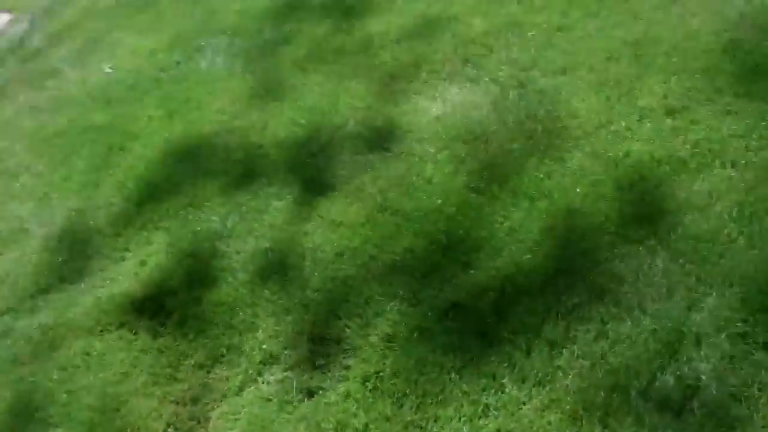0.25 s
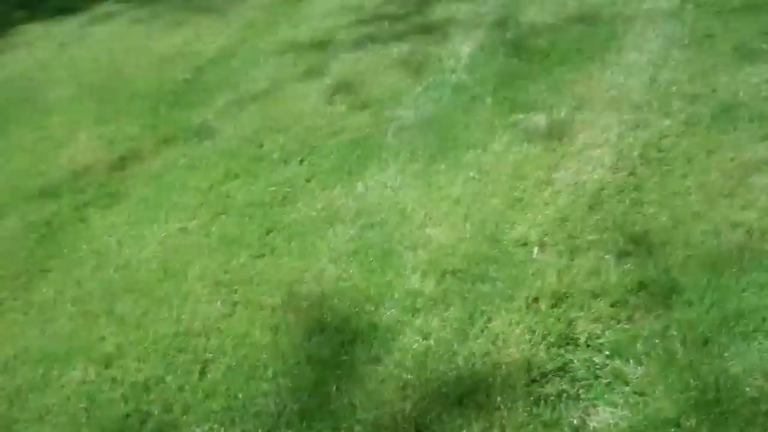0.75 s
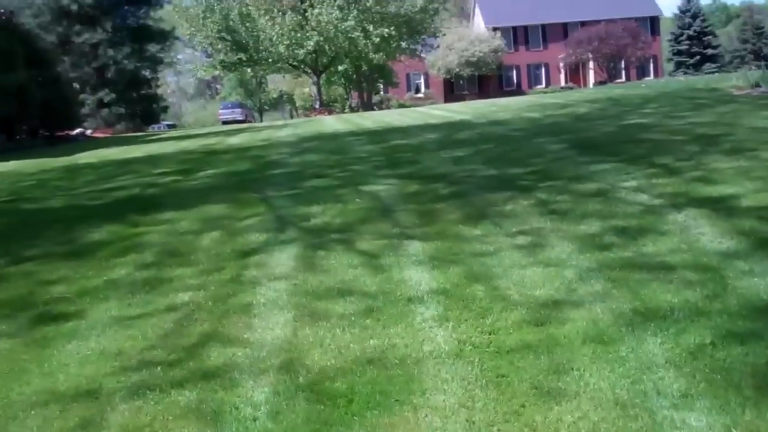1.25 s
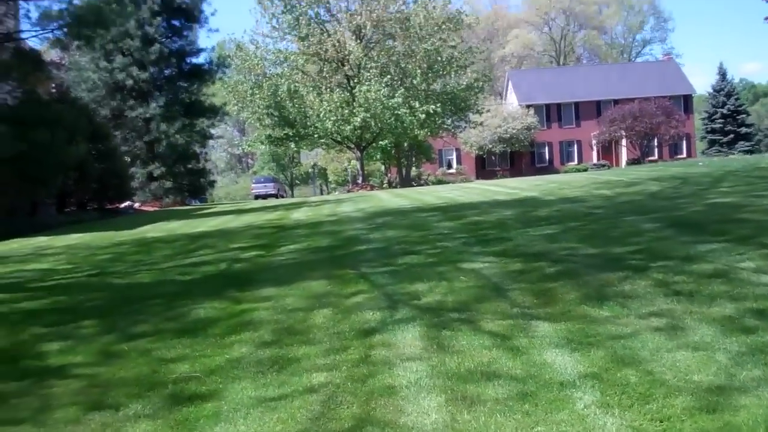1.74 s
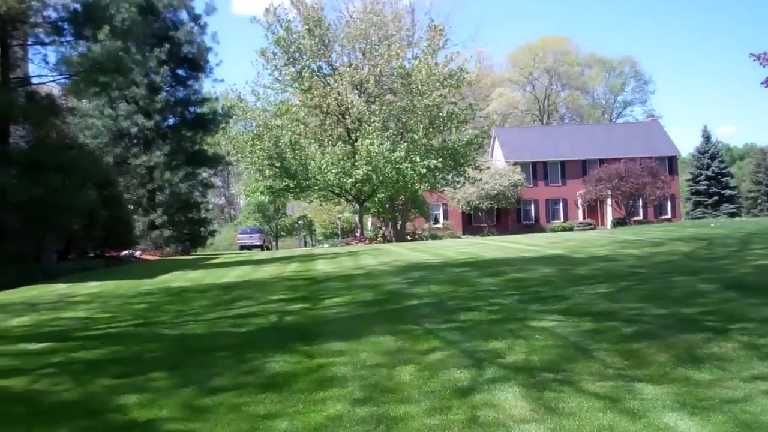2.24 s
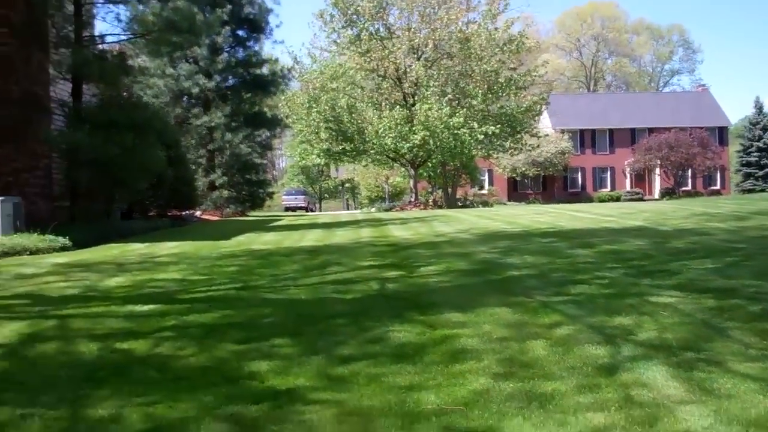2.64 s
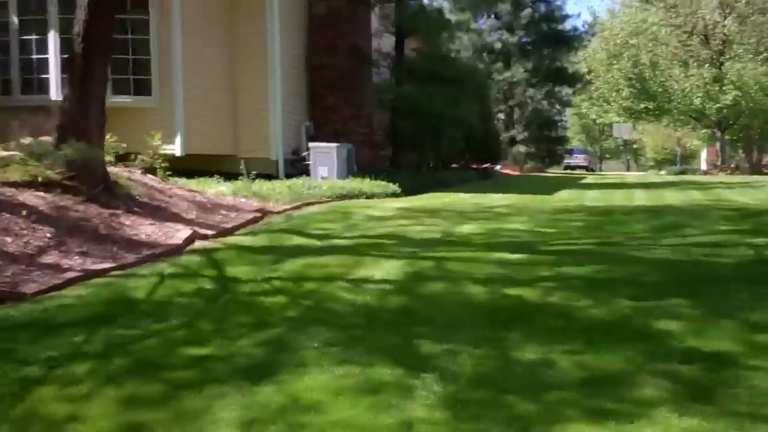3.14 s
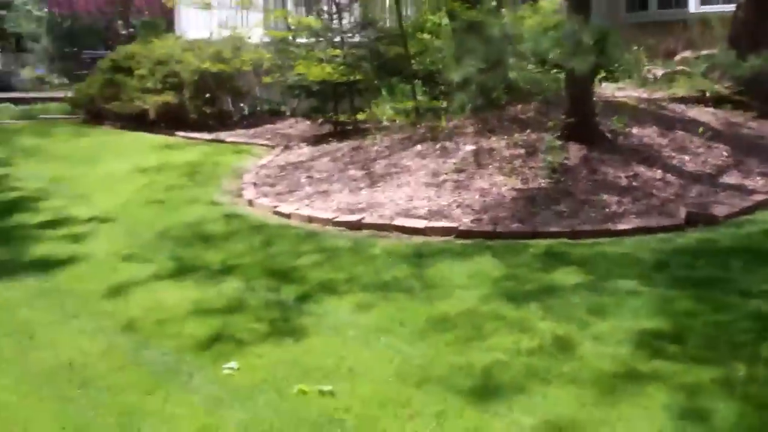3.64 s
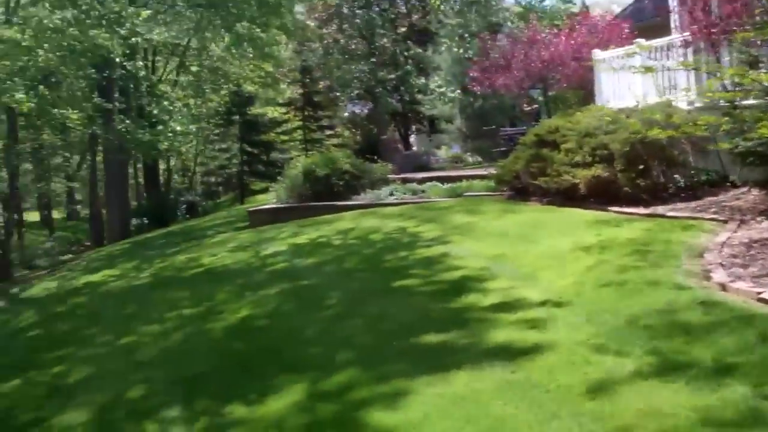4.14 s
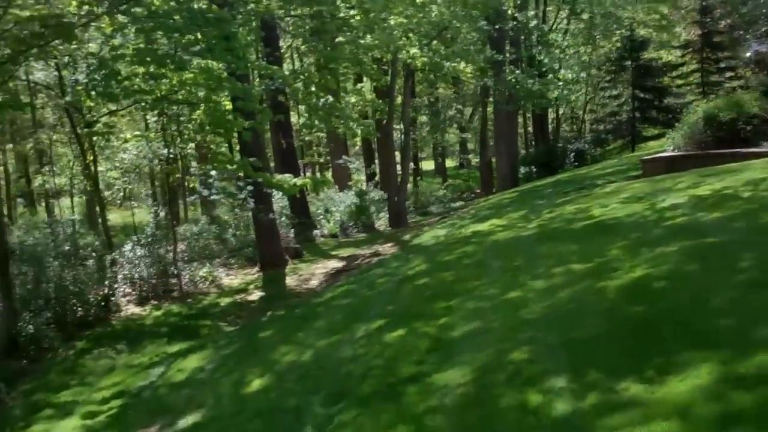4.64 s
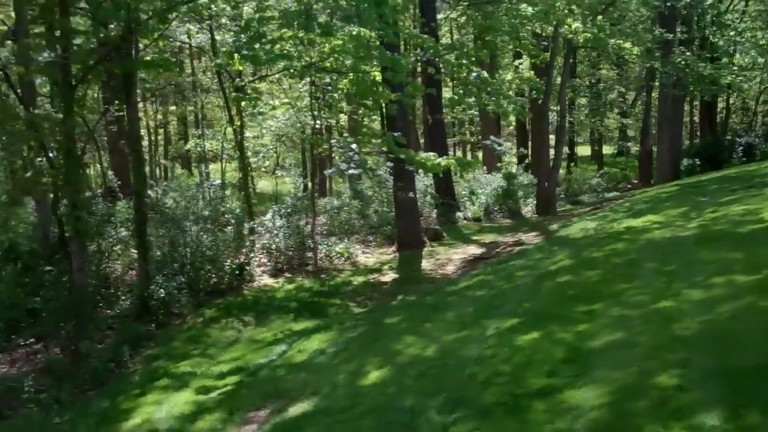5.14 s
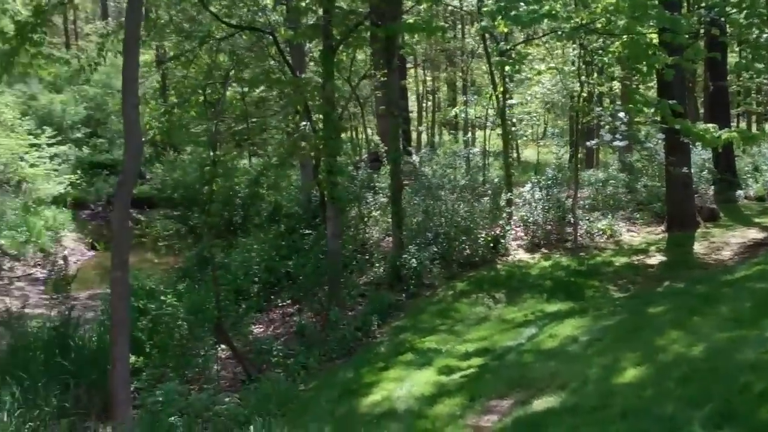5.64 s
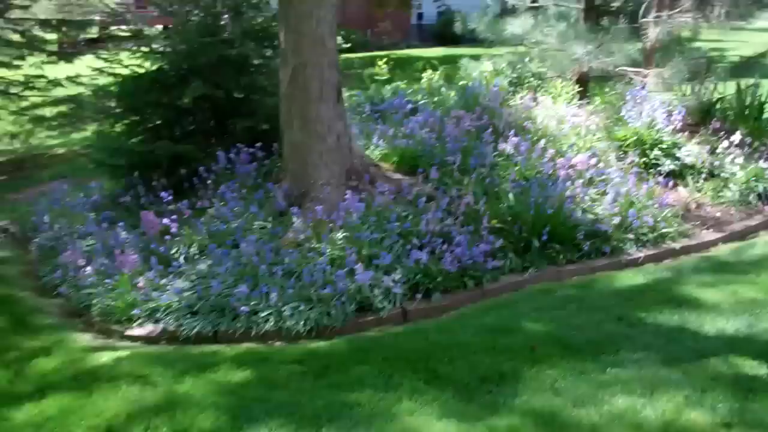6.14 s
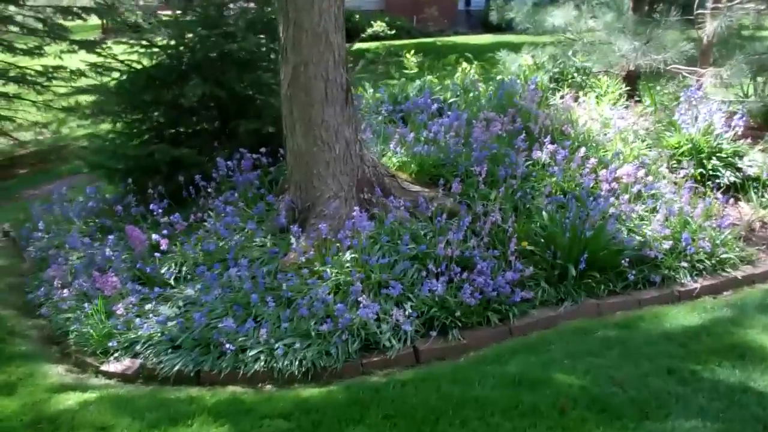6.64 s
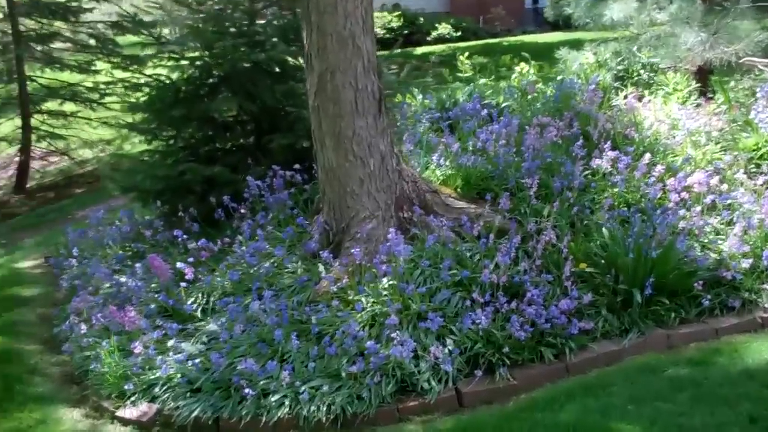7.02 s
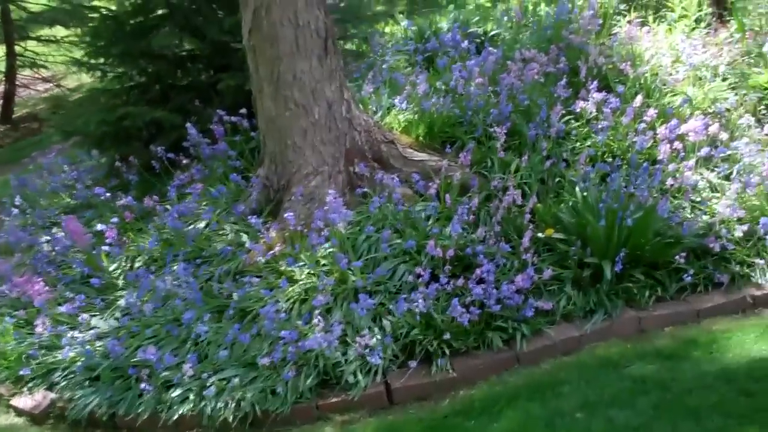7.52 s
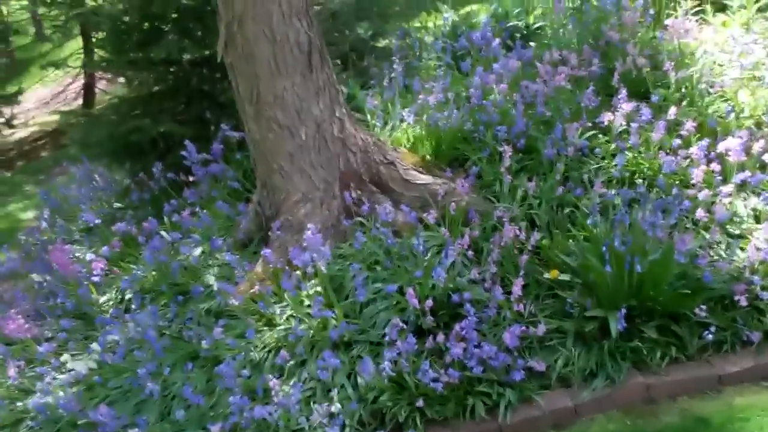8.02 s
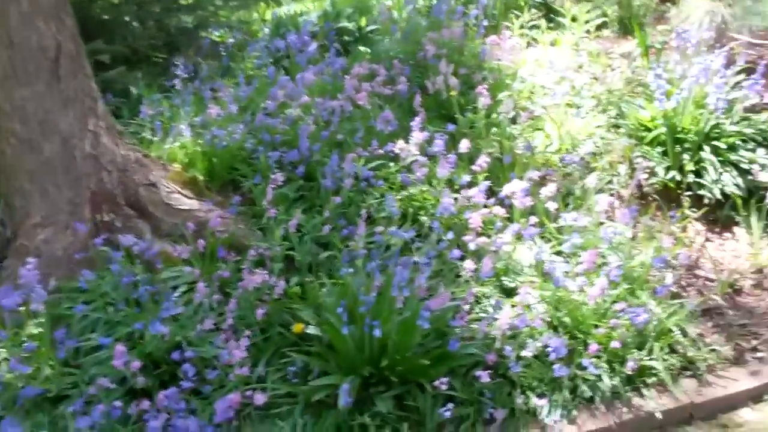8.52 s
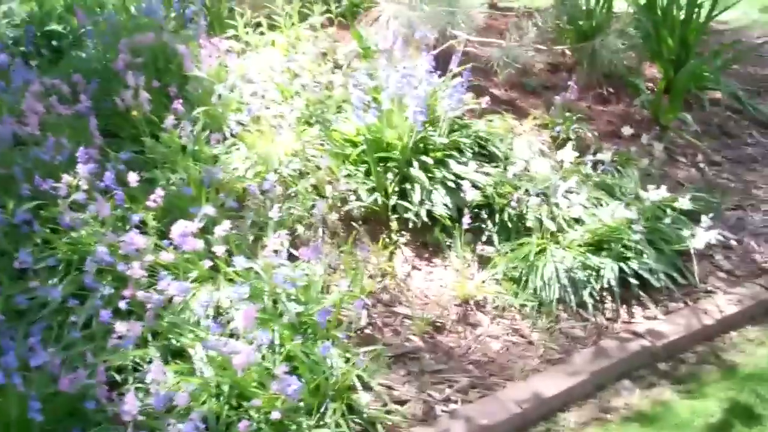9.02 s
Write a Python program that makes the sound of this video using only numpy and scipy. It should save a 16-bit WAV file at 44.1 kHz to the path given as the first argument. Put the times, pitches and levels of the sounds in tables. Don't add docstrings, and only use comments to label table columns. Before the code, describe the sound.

Close two-stroke-like buzzing and tinny clatter for seven seconds, a brief dropout, engine coasts to a stop, then quiet yard with a whistling bird.

```python
import sys
import numpy as np
from scipy import signal
from scipy.fft import rfft, irfft, next_fast_len
from scipy.io import wavfile
from scipy.ndimage import map_coordinates

SR = 44100
rng = np.random.default_rng(int(sys.argv[2]) if len(sys.argv) > 2 else 0)


def boost(x):
    u = np.asarray(x, float) / 20
    return 10 ** u


def transcribe(signal):
    frames = np.atleast_2d(signal).T
    limited = np.clip(frames, -1, 1)
    pcm = np.round(limited * 32767).astype(np.int16)
    wavfile.write(sys.argv[1], SR, pcm)


N = 408807
SECONDS = np.arange(N) / SR

# (time [s], speed [turns/s])
SHAFT_SPEED = [(0, 46.35), (.87, 45.52), (1.56, 43.16), (1.57, 41.87), (2.44, 42.59), (2.48, 44.21),
               (3.65, 43.19), (3.77, 45.46), (4.14, 46.86), (4.79, 43.43), (4.98, 41.26), (5.77, 43.3),
               (6.53, 45.35), (7.05, 43), (7.31, 15.1), (7.7, 3)]
# (time [s], exhaust side level [dB], tin side level [dB])
FACING = [(0, -41.5, -16), (.2, -42.5, -19.5), (.42, -41, -16), (.8, -41, -13.5), (1.35, -40, -14.5),
          (1.75, -43, -22.5), (2.6, -42, -21), (3.22, -42, -21), (3.4, -43.5, -19.5), (4, -45, -23),
          (4.25, -40, -23.5), (4.45, -37.5, -21), (5.05, -32, -21), (6.19, -28.5, -19), (6.23, -41, -22),
          (6.9, -41.5, -25), (7.23, -42, -20.5), (7.45, -43, -13)]
# (time [s], left lag of bass [samples], of treble [samples], direct share [0-1],
# treble left over right [dB])
BEARING = [(0, 3.6, 5.6, 0.56, 2), (.28, 5.1, 5.4, 0.43, -6.5), (.62, 5.7, 5.2, 0.54, -2),
           (.7, 3.6, 4.55, 0.5, -2), (1.12, 2.8, 3.7, 0.62, -3), (1.3, 4.3, 4.2, 0.3, 0),
           (1.65, 6.4, 4.5, 0.7, -8.5), (2.4, 6.45, 5.2, 0.56, -4.5), (3.2, 5.9, 5.7, 0.5, -4),
           (3.45, 5.5, 6, 0.4, -8), (4.3, 5.1, 6, 0, -10.5), (4.7, 5.2, 4.7, 0.37, -2),
           (5.5, 2.7, 5.6, 0.26, -3.5), (6.18, 3.7, 6.4, 0.15, 2.5), (6.25, 3.9, 3.7, 0.15, -10.5),
           (7.4, 3, 2.9, 0.16, -5.5), (8.1, 3.1, 4, 0.64, 0), (9.3, 3.6, 4.2, 0.3, -3)]
# (frequency [Hz], likeness [0-1])
PORT_LIKENESS = [(60, 0.35), (300, 0.98), (700, 1), (1400, 1), (2800, 0.28)]
# (frequency [Hz], width [Hz], level [dB])
MUFFLER_MODES = [(176.6, 47, 3.5), (241, 85, 1.5), (388, 47, -11.5), (568, 59, -11.5), (780, 340, -12.5)]
# (frequency [Hz], level [dB per Hz])
CASING_COLOUR = [(90, -35), (170, -6.5), (500, -7.5), (820, -2.5), (1250, 0), (1700, -8), (2500, -26.5)]
# (frequency [Hz], level [dB per Hz])
INTAKE_COLOUR = [(1000, -19), (1600, -4.5), (1950, 3), (2200, -1), (2500, 1), (4500, 0), (7500, -3),
                 (9500, -13.5)]
# (frequency [Hz], level [dB per Hz])
TIN_COLOUR = [(6500, -26), (8500, -2.5), (10000, 0), (14300, -0.5)]
# (time [s], peak level [dB])
CLACKS = [(0.1994, -8), (0.4597, -11), (0.571, -3), (0.6602, -1.5), (0.7447, -15), (0.831, -7), (0.853, -8),
          (0.8754, -11), (0.8979, -11), (0.9418, -6), (0.9632, -5), (1.0293, -6), (1.053, -7), (1.144, 0.5),
          (1.2085, -8), (1.2326, -2.5), (1.3007, -7), (1.3234, -11), (1.3683, -14), (1.4145, -1),
          (1.484, -3), (1.5758, -20), (1.647, -10), (1.7434, -10), (1.8148, -15), (1.8392, -9),
          (1.9101, -22), (1.9355, -8.5), (2.1206, -14), (2.265, -12), (2.359, -9), (2.451, -14),
          (2.544, -13), (2.6334, -21), (2.7006, -13), (2.793, -8.5), (3.016, -17), (3.045, -18),
          (3.2259, -14), (3.296, -11), (3.3872, -10), (3.4795, -7), (3.5721, -13), (3.6174, -13.5),
          (3.687, -11), (4.1025, -14), (4.428, -8.5), (4.8339, -22), (5.124, -11), (6.2417, -29),
          (6.2542, -24), (6.277, -9), (6.369, -11), (6.4782, -11.5), (6.523, -15), (6.611, -15),
          (6.7023, -10), (6.8148, -11), (7.0, -13), (7.15, -17)]
# (time [s], peak level [dB], ring [Hz], fin ring level [dB])
KNOCKS = [(7.193, -30, 920, -60), (7.228, -20, 1000, -63.5), (7.252, -16, 1500, -60),
          (7.264, -13.5, 1360, -57), (7.279, -17, 1290, -60), (7.335, -13.5, 894, -52),
          (7.38, -15.5, 1390, -48), (7.409, -19, 1170, -52), (7.506, -17, 1710, -53),
          (7.554, -23.5, 1440, -34.5), (7.71, -27, 1390, -69)]
# (time [s], peak level [dB])
TICKS = [(7.336, -29), (7.403, -28), (7.506, -34), (7.553, -32), (7.71, -46), (7.456, -27), (7.471, -29),
         (7.486, -30), (7.888, -31), (8.291, -38), (8.359, -40), (8.619, -40), (8.64, -29.5),
         (8.677, -28.5), (9.079, -33), (9.128, -31)]
# (time [s], peak level [dB])
BUMPS = [
    (3.314, -21),
    (3.351, -18),
    (3.371, -30),
    (3.38, -18),
]
# (time [s], peak level [dB], rise over 20 dB [s], fall over 20 dB [s])
STEPS = [
    (7.62, -47, .15, 0.26),
    (7.725, -40.5, 0.035, 0.18),
    (7.92, -44.5, 0.074, 0.062),
    (8.19, -39, 0.086, 0.41),
    (8.81, -39, 0.16, 0.17),
    (8.95, -44, 0.11, 0.061),
    (9.15, -43, 0.23, 0.044),
]
# (frequency [Hz], level [dB per Hz])
GRASS_COLOUR = [(700, -9), (1300, 6), (2500, -2), (4000, -1), (7000, -8), (10000, -2), (14200, 1.5)]
# (time [s], level [dB])
YARD_LEVEL = [(0, -65), (3.1, -60), (3.4, -50), (3.6, -64), (4.2, -63), (5.5, -50), (6.18, -54),
              (6.25, -61), (7, -63), (7.5, -53.5), (9.27, -54.5)]
# (frequency [Hz], level [dB per Hz])
RUMBLE_COLOUR = [(20, -14), (40, -12), (70, 1), (120, -1.5), (160, 0), (210, -4.5), (800, -3), (1100, -9),
                 (1500, -22.5), (2500, -21), (7500, -26), (13000, -23.5), (14500, -18.5)]
# (time [s], length [s], first pitch [Hz], last pitch [Hz], level [dB])
BIRD_NOTES = [
    (7.524, 0.2, 2780, 2670, -36),
    (8.158, 0.11, 2700, 2150, -36),
    (8.248, 0.083, 2050, 3050, -38),
    (8.3, 0.054, 2790, 2770, -38),
    (8.35, 0.097, 2800, 2800, -46),
    (9.002, 0.065, 2800, 2760, -42),
    (9.06, 0.21, 2290, 2310, -42.5),
    (9.2, .07, 2490, 2490, -39),
]
# (frequency [Hz], level [dB])
CAVITY = [(3000, 0), (3800, -0.5), (4400, 1.5), (4800, 2.5), (5300, -2), (5700, 1.5), (6800, 2), (7700, -2),
          (8500, -2.5), (9400, 3.5), (10000, 1.5), (10600, -2), (12000, 6), (13000, 4), (14000, 5.5)]
# (frequency [Hz], width [Hz], level [dB])
FIN_MODES = [(1587, 210, -7), (2207, 26, 0.5), (4706, 11, 6), (7030, 32, 1), (9394, 61, 5),
             (11940, 29, -10), (12560, 63, 3)]
# (time [s], level [dB])
SIGHS = [
    (7.275, -25),
    (7.338, -30),
    (7.416, -29),
    (7.528, -33),
    (7.66, -49),
]
# (time [s], level over the usual stroke [dB])
HARD_STROKES = [(0.09, 2), (0.178, -1), (0.23, 8), (0.276, 6), (0.486, 9), (0.534, 7.5), (0.755, 7),
                (0.89, 11), (0.957, 9), (1.046, 8), (1.074, 10), (1.324, -4), (1.417, 4), (1.566, 3),
                (1.654, 8), (1.734, 8.5), (1.828, 7.5), (1.924, 11), (2.039, 7.5), (2.186, 13), (2.218, 11),
                (2.348, 9), (2.454, 6), (2.639, -1), (2.704, 6), (2.87, 6), (2.964, 10), (3.036, 4.0),
                (3.122, 10), (3.371, 7), (3.722, 5.0), (3.827, 3), (3.964, 1), (3.999, 2), (4.062, -1),
                (4.151, -10), (4.342, 8), (4.415, 5), (4.511, 6), (4.586, 6), (4.661, 8), (4.77, 4),
                (4.839, 0), (4.992, 8), (5.106, 10), (5.235, 10.5), (5.443, 10.5), (5.538, 10), (5.648, 6),
                (5.739, 5), (5.829, 7), (6.01, 5), (6.108, -1), (6.169, -6), (6.282, -3), (6.373, -3),
                (6.465, 0), (6.6, 11), (6.787, 11), (6.898, 9)]
# (time [s], first dip [Hz], echo share [0-1], likeness of the top treble [0-1])
LAWN = [(0, 800, 0, 0.6), (.6, 885, 0.23, 0.78), (.8, 910, 0.4, 0.47), (2.2, 950, 0.32, 0.34),
        (2.6, 900, 0.07, 0.34), (3.2, 1100, 0.05, 0.3), (3.5, 1350, .4, 0.64), (4.35, 1230, 0.23, 0.42),
        (4.7, 1250, 0.4, 0.11), (5.3, 1250, 0.05, 0.12), (6.18, 1310, 0, 0.11), (6.25, 1280, 0.18, .3),
        (7.4, 1240, 0.1, .35), (8.1, 1250, .05, 0.44)]
# (time [s], notch depth [dB], left lift [dB], left top loss [dB],
# share of blows heard off the walls [0-1])
BODY = [(0, 9, 2, 6, 0.3), (.6, 7, 1, 4, 0.33), (.8, -11, 5, 3, 0.3), (1.4, -3, 0.5, 7, 0.2),
        (1.7, -4, 4, 2, 0.12), (3.2, 8, -6, 6, 0.2), (3.5, 9, 7, -1, 0.27), (4.2, 9, 11, -4, 0.3),
        (4.6, 6, -2, 5, 0.4), (5.3, 13, 4, 1, 0.5), (6.18, -1, -2, 4, 0.53), (6.25, 8, -1, -1, 0.23),
        (7.2, 8, 6, -2, 0.22), (7.8, 5, 1, 5, 0.4), (9.3, 6, 5, 3, .3)]
EARLY_STROKES = [.098, .183, .269, .335, .4, .465, .859, .97, 1.15, 1.42, 1.583, 1.725, 2.034, 2.127, 2.199,
                 2.64, 2.708, 2.799, 2.981, 3.142, 3.233, 3.302, 3.486, 3.739, 4.0, 4.259, 4.346, 4.434,
                 4.521, 4.68, 4.771, 4.841, 4.911, 4.983, 5.129, 5.177, 5.249, 5.32, 5.391, 5.462, 5.532,
                 5.926, 6.462, 6.529, 6.618, 6.708, 6.822, 6.938, 7.007]
# (time [s], level [dB])
HUM_LEVEL = [
    (7.4, -79),
    (7.85, -68),
    (8.0, -56),
    (8.55, -57),
    (8.75, -67),
    (9.27, -64),
]

CUT_OUT_S, CUT_BACK_S = 6.188, 6.24
IDLE_HZ, LAST_FIRING_S, FIRST_TURN = 43, 7.43, .68
# (dB, share of exhaust side, share of tin side, dB per tenfold speed)
CASING_MIX, INTAKE_MIX = (-38, 0.8, -0.01, -16.5), (-28, 0.1641, 0.62, -3)
USUAL_EXHAUST_DB, USUAL_TIN_DB = -42, -20.5
TIN_SLOWS_DB, SECOND_SPOT_DB = 33, 2
STILL_S, DYING_DB_PER_S = 7.44, 94
THUD_LAG_S, EARLY_BY_S, THINNER_DB = .0065, .0021, 3.5
RISE_S, WALL_SMEAR_S = 0.00033, 0.0039
HUM_HZ = 166
BASS_PAN_DB, LOCKING, DIP_SPACING_HZ = -2.5, 0.44, 927
NOTCH_HZ, NOTCH_WIDTH_HZ, LIFT_HZ, LIFT_WIDTH_HZ, TOP_LOSS_HZ = 5300, 160, 11300, 1200, 12100


def unit(x):
    return x / np.sqrt(np.mean(x ** 2) + 1e-20)


def along(points, hz):
    f, v = np.transpose(points)
    return np.interp(np.log(hz + 1), np.log(f + 1), v)


def curves(rows, t=SECONDS):
    s, *columns = np.transpose(rows)
    return [np.interp(t, s, column) for column in columns]


def wobble(rate):
    knots = rng.standard_normal(int(N * rate / SR) + 4)
    return map_coordinates(knots, [np.arange(N) * rate / SR])


def filtered(x, response):
    m = next_fast_len(N + SR // 2)
    return irfft(rfft(x, m) * response(np.fft.rfftfreq(m, 1 / SR)), m)[..., :N]


def resonances(modes):
    def response(f):
        total = 0
        for k, (centre, width, db) in enumerate(modes):
            damping = 1j * f * width
            total = total + (-1) ** k * boost(db) * damping / (centre * centre - f * f + damping)
        return total
    return response


def bursts(times, sizes, decay_s):
    spikes = np.bincount(np.round(np.asarray(times) * SR).astype(int), sizes, N)[:N]
    return signal.lfilter([1], [1, -np.exp(-1 / (decay_s * SR))], spikes)


def hiss(spectrum, envelope, cavity=CAVITY):
    colour = lambda hz: boost(along(spectrum, hz) + along(cavity, hz))
    return unit(filtered(envelope * rng.standard_normal((2, N)), colour))


def pace():
    slowed = np.minimum(curves(SHAFT_SPEED)[0] / IDLE_HZ, 1)
    return np.where(SECONDS > CUT_BACK_S, slowed, 1)


def firings():
    turns = np.cumsum(curves(SHAFT_SPEED)[0]) / SR + FIRST_TURN
    fire = np.flatnonzero(np.diff(np.floor(turns))) / SR
    return fire[fire < LAST_FIRING_S]


def charge():
    coarse = SECONDS[::100]
    strokes = [db * np.exp(-((coarse - s + 0.0096) / 0.02) ** 2) for s, db in HARD_STROKES]
    return np.interp(SECONDS, coarse, np.max(strokes, axis=0))


def loudness():
    exhaust_db, tin_db = curves(FACING)
    slowing = np.log10(pace())
    dying_db = DYING_DB_PER_S * np.maximum(SECONDS - STILL_S, 0)

    def mix(db, exhaust_share, tin_share, per_tenfold_db):
        sides_db = exhaust_share * (exhaust_db - USUAL_EXHAUST_DB) + tin_share * (tin_db - USUAL_TIN_DB)
        return db + sides_db + per_tenfold_db * slowing - dying_db

    casing_db = mix(*CASING_MIX) + SECOND_SPOT_DB * (SECONDS > CUT_BACK_S)
    return exhaust_db, casing_db, mix(*INTAKE_MIX), tin_db + TIN_SLOWS_DB * slowing


def muffler(fire, charge_db):
    chance = rng.standard_normal((3, len(fire)))
    early = np.abs(fire[:, None] + THUD_LAG_S - EARLY_STROKES).min(axis=1) < .5 / IDLE_HZ
    slug_s = fire + 0.00042 * chance[0] - EARLY_BY_S * early + 0.00079
    slug = -bursts(slug_s, boost(chance[1] - THINNER_DB * early), 0.00075)
    puff = bursts(fire, boost(2.5 * chance[2]), 0.0067) * rng.standard_normal((2, N))
    pipe = resonances(MUFFLER_MODES)
    steep = lambda f: pipe(f) * (1j * f / (130 + 1j * f)) ** 4
    shared = [[1], [0]]
    thud = unit(filtered(slug, steep)) * shared + 0.2 * unit(filtered(puff, steep))
    cylinder = resonances([(172, 110, 0)])
    deep = unit(filtered(slug, lambda f: cylinder(f) ** 2 * np.exp(-2j * np.pi * f * .005)))
    thud = thud + 4 * np.sqrt(1 - pace()) * pace() ** 2 * deep * shared
    early_db = 6.0 * np.interp(SECONDS - .002, fire, early)
    hard = slug * boost(1.22 * charge_db + wobble(30) + early_db)
    chamber = resonances([(373, 86, 0)])
    ring = unit(filtered(hard, lambda f: chamber(f) ** 2))
    return thud * boost(0.17 * (charge_db - 1.5)) + 0.48 * ring * shared


def smeared(blows):
    def lagging(x, s):
        hold = np.exp(-1 / (s * SR))
        return signal.lfilter([1 - hold], [1, -hold], x)

    walls = np.clip(curves(BODY)[3], 0, 1)
    echoed = lagging(lagging(blows, WALL_SMEAR_S), WALL_SMEAR_S)
    return (1 - walls) * lagging(blows, RISE_S) + walls * echoed


def blows(fire, charge_db):
    chance = rng.standard_normal((4, len(fire) - 1))
    shake_db = 1.8 * chance[0] + .55 * np.interp(fire[:-1], SECONDS, charge_db)
    shake = smeared(unit(bursts(fire[1:] - .001, boost(shake_db), 0.006)))
    shake = shake * pace() ** .4 * (1.1 - .7 * curves(BODY)[3])
    jolt = smeared(unit(bursts(fire[1:] - .0009, boost(2.2 * chance[1]), 0.0046)))
    slap_s = fire[:-1] + np.diff(fire) * (.45 + 0.11 * chance[2])
    slap = unit(bursts(slap_s, boost(4 * chance[3]), 0.002))
    return shake, jolt, slap


def casing(steady, shake, rattle):
    return hiss(CASING_COLOUR, (steady + 0.67 * shake) * boost(0.088 * rattle + 0.07 * wobble(10)))


def intake(steady, shake, jolt, slap, rattle):
    envelope = steady + 0.55 * shake + 0.2 * jolt + 0.18 * slap
    return hiss(INTAKE_COLOUR, envelope * boost(0.7 * rattle + 0.8 * wobble(9)))


def tin(steady, jolt, slap, rattle):
    envelope = steady + 0.72 * jolt + 0.11 * slap
    return hiss(TIN_COLOUR, envelope * boost(0.8 * rattle + 1.44 * wobble(30)))


def fins(jolt):
    return unit(filtered((0.038 + jolt) * rng.standard_normal((2, N)), resonances(FIN_MODES)))


def clacks():
    s, db = np.transpose(CLACKS)
    envelope = bursts(s, boost(db - 4.5), 0.0022) + bursts(s, boost(db - 8.5), 0.016)
    return envelope * hiss([(1200, -20), (2000, -4.5), (7000, -6), (9000, -1.0), (14300, 6.5)], 1)


def engine():
    muffler_db, casing_db, intake_db, tin_db = loudness()
    fire, charge_db = firings(), charge()
    shake, jolt, slap = blows(fire, charge_db)
    steady = pace() ** 0.54
    rattle = wobble(8)
    out = boost(muffler_db - 2.0) * muffler(fire, charge_db)
    out = out + boost(casing_db - 1.05) * casing(steady, shake, rattle)
    out = out + boost(intake_db - 1.38) * intake(steady, shake, jolt, slap, rattle)
    out = out + boost(tin_db + 0.64) * tin(steady, jolt, slap, rattle)
    out = out + boost((intake_db + tin_db) / 2 - 10.0) * fins(jolt)
    return out + 1.45 * clacks()


def yard():
    a, b = hiss(RUMBLE_COLOUR, boost(1.6 * wobble(6.7)), cavity=[(1000, 0)])
    apart = filtered(b, lambda hz: np.clip(0.1 + hz / 3000, 0, 1))
    hum_level = boost(curves(HUM_LEVEL)[0] + 2.5 * wobble(8))
    hum = hum_level * np.sin(2 * np.pi * HUM_HZ * SECONDS + wobble(6))
    rumble = np.array([0.89 * (a + apart), 1.13 * (a - apart)])
    return hum + boost(curves(YARD_LEVEL)[0] + 9.5) * rumble


def bumps():
    s, db = np.transpose(BUMPS)
    push = bursts(s, boost(db) * (-1) ** np.arange(len(s)), 0.00035)
    dull = lambda f: 1j * f / (150 + 1j * f) * 900 / (900 + 1j * f)
    return filtered(push, dull) * [[2.2], [.2]]


def knocks():
    out, t = np.zeros((2, N)), np.arange(SR // 5) / SR
    for s, db, hz, fin_db in KNOCKS:
        ring = np.sin(2 * np.pi * hz * t) * boost(-60 * t / 0.029)
        ring = ring + rng.standard_normal((2, len(t))) * boost(-60 * t / 0.07)
        drift = 0.049 * np.cumsum(rng.standard_normal(len(t)))
        fin = boost(fin_db + 12.5) * np.sin(2 * np.pi * 4620 * t + drift)
        fin = fin * (boost(-60 * t / 0.034) + 0.37 * boost(-60 * t / 0.46))
        out[:, round(s * SR):][:, :len(t)] += boost(db - 4.5) * ring + fin
    s, db = np.transpose(SIGHS)
    sigh = bursts(s, boost(db + 10.0), 0.00078)
    sigh = filtered(sigh, resonances([(150, 62, 0), (392, 51, 1.5)])) * [[1], [0]]
    return filtered(out, lambda f: 1j * f / (700 + 1j * f) * (4500 / (4500 + 1j * f)) ** 2) + sigh


def ticks():
    s, db = np.transpose(TICKS)
    colour = [(1200, -32), (2000, 9.0), (5000, 6.5), (10000, 8.5), (14500, -18)]
    return bursts(s, boost(db), 0.0027) * hiss(colour, 1)


def bird():
    song, flutter, waver_db = np.zeros(N), wobble(60), 4 * wobble(45)
    for s, length, first_hz, last_hz, db in BIRD_NOTES:
        span = np.arange(round(s * SR), min(round((s + length) * SR), N))
        u = (span / SR - s) / length
        hz = (first_hz + (last_hz - first_hz) * u) * (1 + 0.024 * flutter[span])
        swell = boost(db - 13 + waver_db[span]) * np.sin(np.pi * u)
        song[span] += swell * np.sin(2 * np.pi * np.cumsum(hz) / SR)
    tail = rng.standard_normal((2, SR // 4)) * boost(-60 * np.arange(SR // 4) / SR / .2)
    tail = tail / np.linalg.norm(tail[0])
    return song * [[-.5], [1.4]] + signal.oaconvolve(song[None], tail, axes=1)[:, :N]


def steps():
    swish = 0
    for s, db, rise, fall in STEPS:
        swish = swish + boost(db - 20 * np.maximum((s - SECONDS) / rise, (SECONDS - s) / fall))
    crackles = bursts(rng.random(3000) * N / SR, rng.exponential(size=3000), 0.0014)
    return boost(4.5) * swish * hiss(GRASS_COLOUR, 1 + 0.24 * unit(crackles))


def lawn_echo(hz, t):
    dip_hz, echo, _ = curves(LAWN, t)
    echo = echo * along([(300, 0), (700, 1), (2400, 1), (3600, 0)], hz)
    comb = np.abs(1 - echo * np.exp(-2j * np.pi * (hz - dip_hz) / DIP_SPACING_HZ))
    return comb / np.sqrt(1 + echo ** 2)


def camera_body(hz, t):
    notch_db, lift_db, loss_db, _ = curves(BODY, t)
    bump = lambda centre_hz, width_hz: np.exp(-((hz - centre_hz) / width_hz) ** 2)
    left_db = lift_db * bump(LIFT_HZ, LIFT_WIDTH_HZ) - 2.0 * bump(9200, 500)
    left_db = left_db - loss_db * np.clip((hz - TOP_LOSS_HZ) / 1500, 0, 1)
    return boost(-notch_db * bump(NOTCH_HZ, NOTCH_WIDTH_HZ)), boost(left_db)


def ports(pair):
    hz, t, (a, b) = signal.stft(pair, SR, nperseg=256)
    hz = hz[:, None]
    treble = np.clip((hz - 2400) / 1200, 0, 1)
    top = np.clip((hz - 4500) / 3000, 0, 1)
    bass_lag, treble_lag, direct, treble_db = curves(BEARING, t)
    top_alike = curves(LAWN, t)[2]
    beyond = np.clip((2 * hz * bass_lag / SR - 1.2) / 0.2, 0, 1)
    lag = 2 * np.pi * hz * (bass_lag + top * (treble_lag - bass_lag)) / SR
    locked = LOCKING * treble * (hz < 8800)
    alike = 0.092 + direct + beyond * (top_alike - direct)
    alike = alike * (1 + 0.36 * locked * np.cos(lag) ** 4)
    lag = lag - locked / 2 * np.sin(2 * lag)
    low_alike = along(PORT_LIKENESS, hz)
    turn = np.arccos(np.clip(low_alike + treble * (alike - low_alike), 0, .97)) / 2
    shadow = np.clip((hz - 6000) / 5000, 0, 1)
    shadow_db = BASS_PAN_DB + (treble_db - BASS_PAN_DB) * shadow + 0.12 * treble
    side = boost(shadow_db / 2) * np.exp(-1j * lag / 2)
    notch, left = camera_body(hz, t)
    gain = lawn_echo(hz, t) * notch
    a, b = gain * np.cos(turn) * a, gain * np.sin(turn) * b
    return signal.istft([(a + b) * side * left, (a - b) / side], SR, nperseg=256)[1][:, :N]


def scene():
    near = engine() + knocks() + ticks() + steps()
    return ports(near) + yard() + bumps() + bird()


def band_limit(x):
    return signal.sosfilt(signal.butter(12, 15450, fs=SR, output="sos"), x)


def record(dry):
    out, back = CUT_OUT_S, CUT_BACK_S
    fade_out = [(out, 0), (out + 0.00064, -17), (out + 0.008, -45), (out + 0.026, -62), (out + .032, -120)]
    fade_in = [(back - .004, -120), (back - .003, -40), (back, -20), (back + 0.0016, 0)]
    gain = boost(curves(fade_out + fade_in)[0])
    band = lambda hz: boost(along([(14150, 0), (14450, -33), (14700, -75)], hz))
    mix = np.clip(filtered(dry * gain, band), -.92, .92)
    return band_limit(mix)


dry = scene()
out = record(dry)
transcribe(out)
```